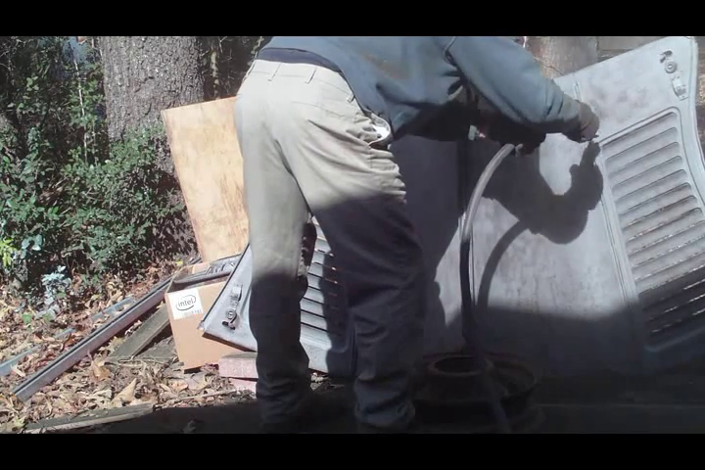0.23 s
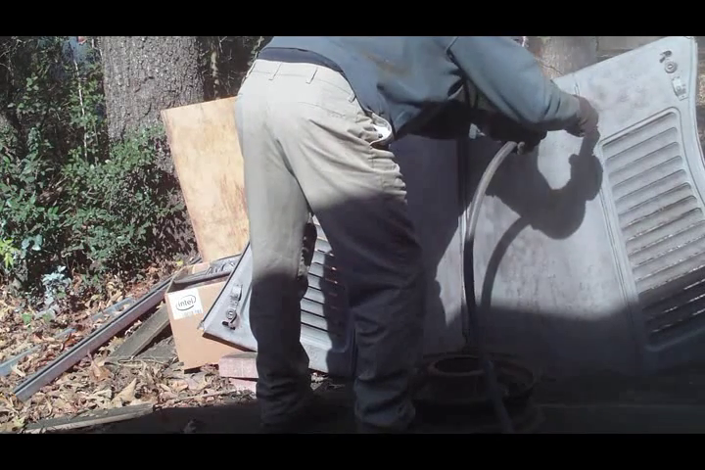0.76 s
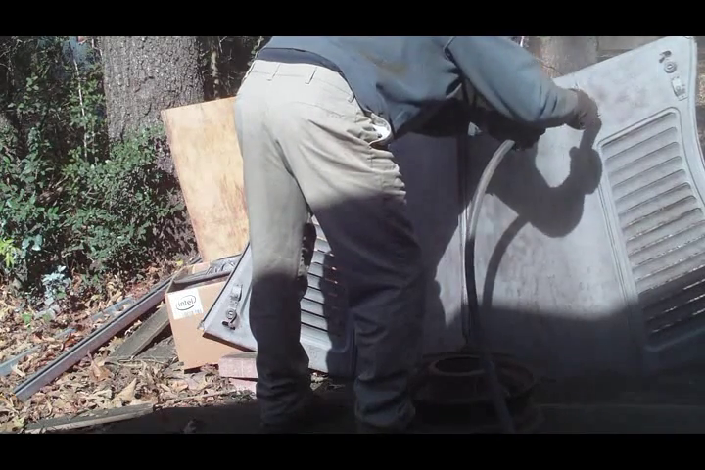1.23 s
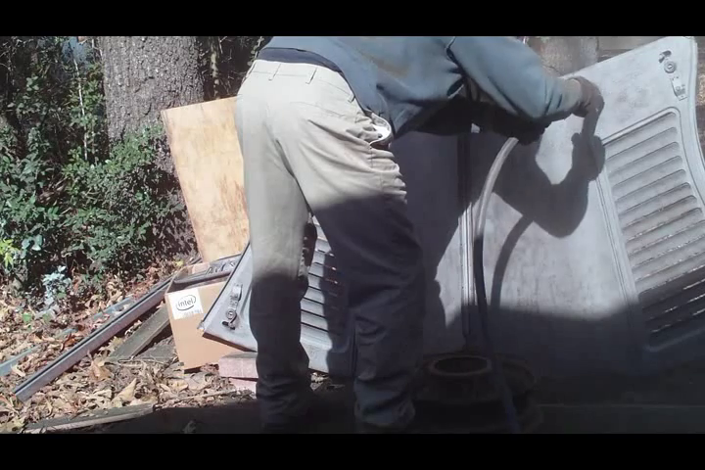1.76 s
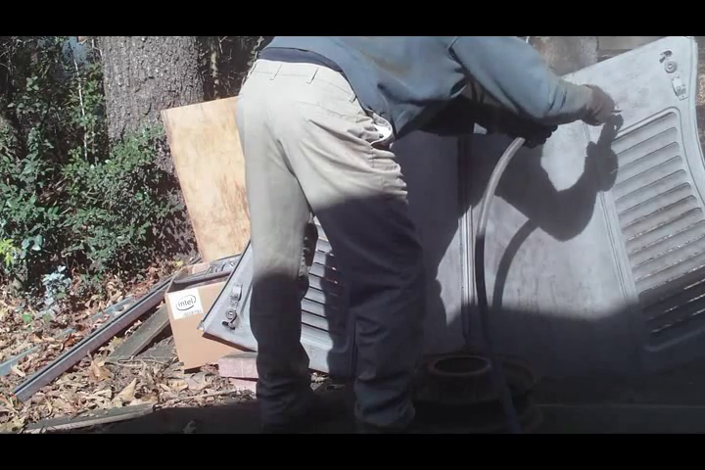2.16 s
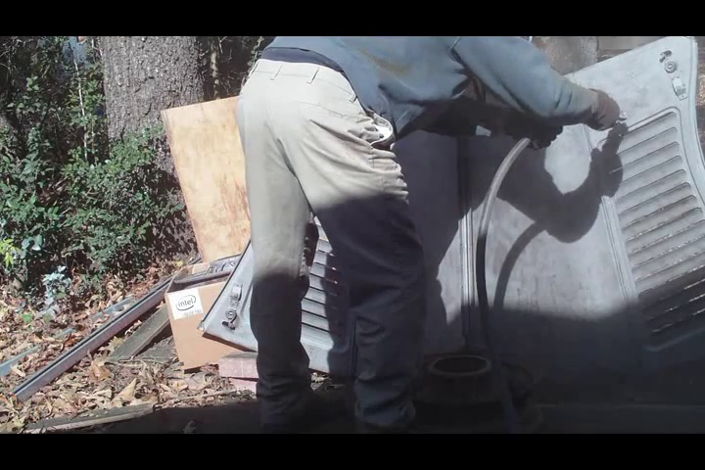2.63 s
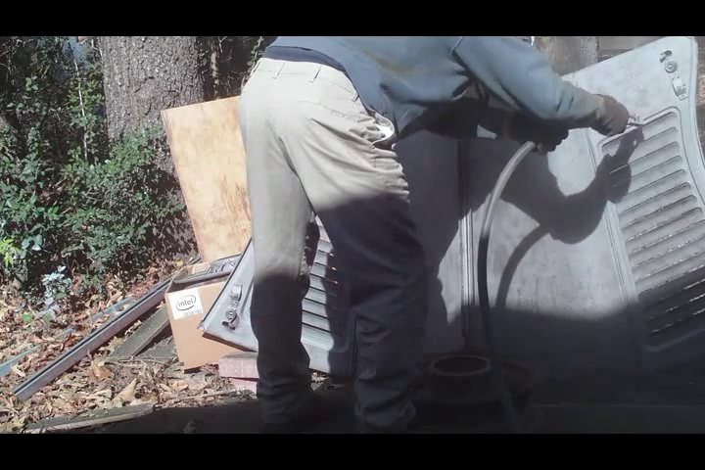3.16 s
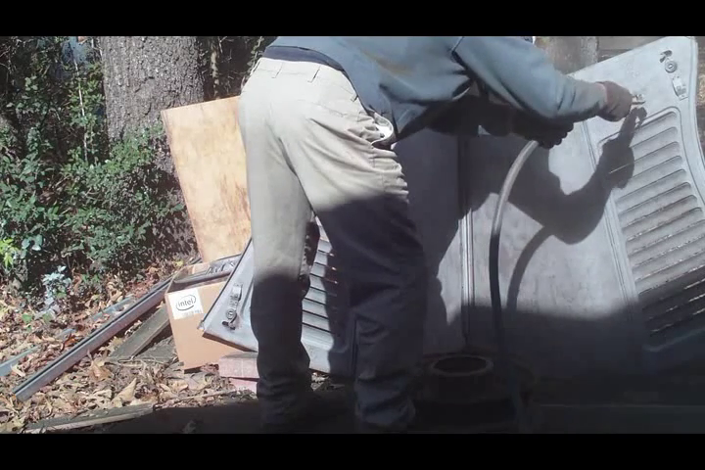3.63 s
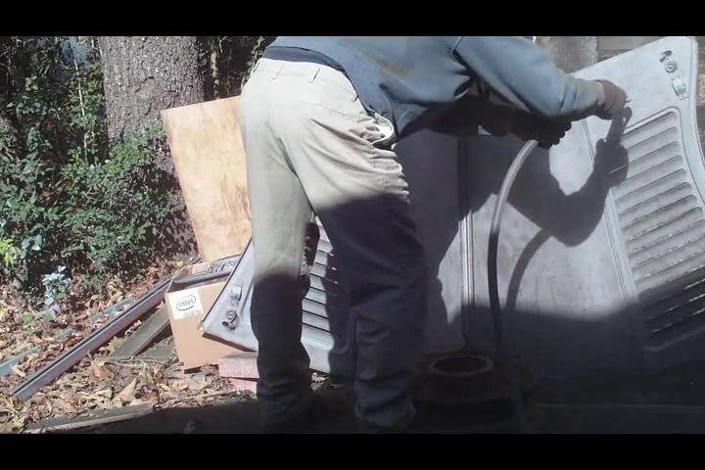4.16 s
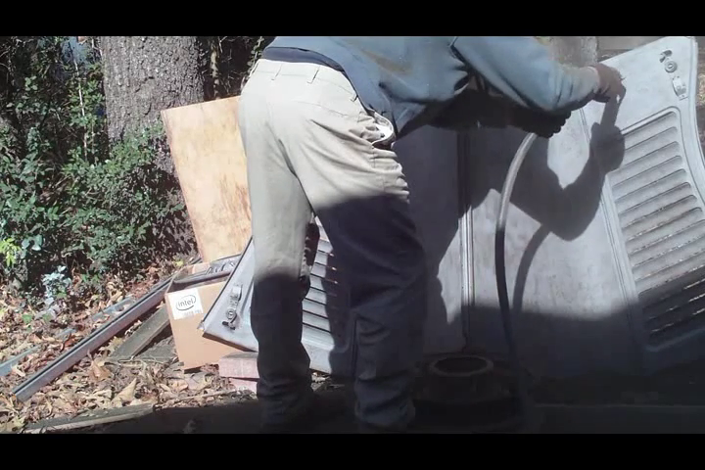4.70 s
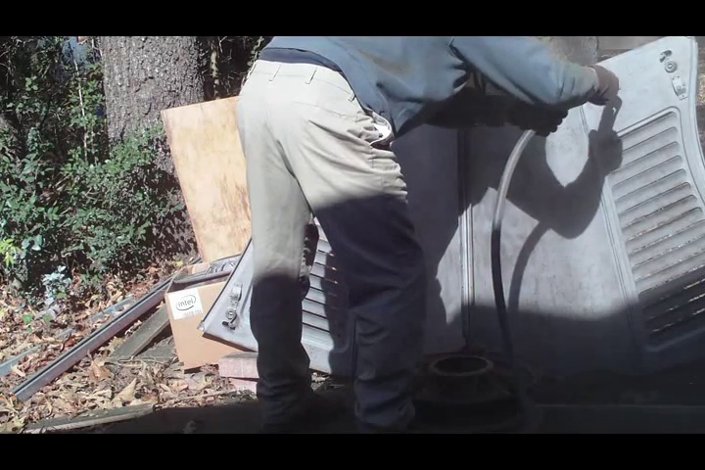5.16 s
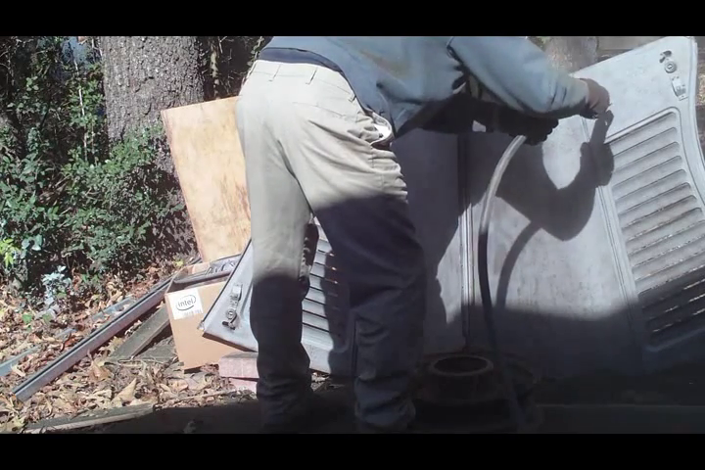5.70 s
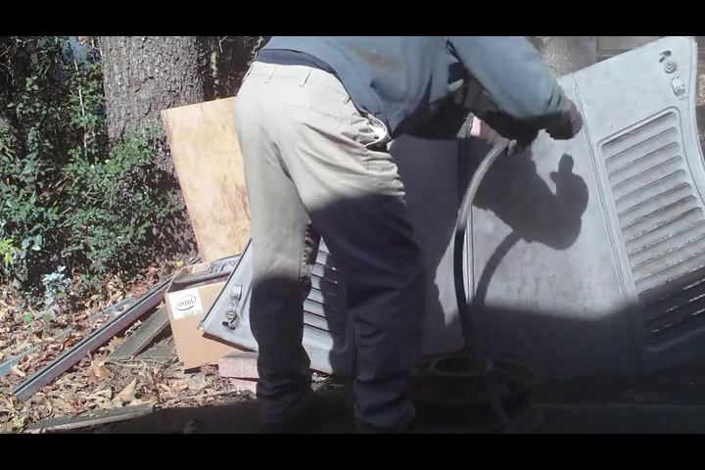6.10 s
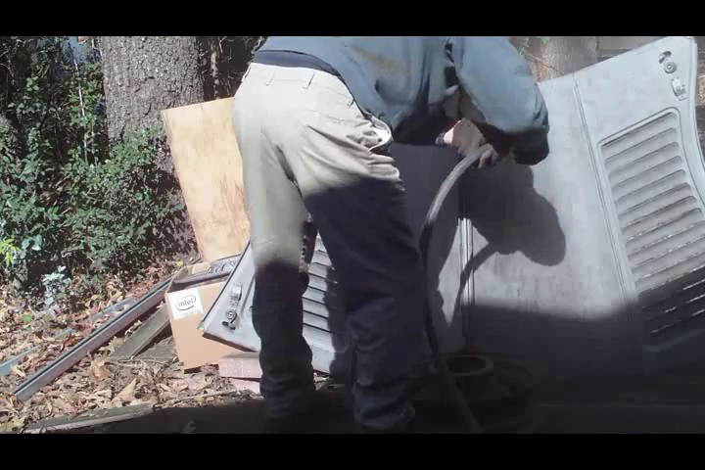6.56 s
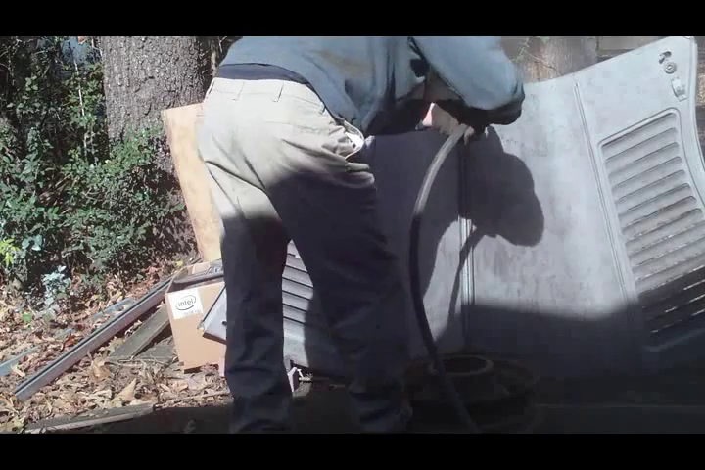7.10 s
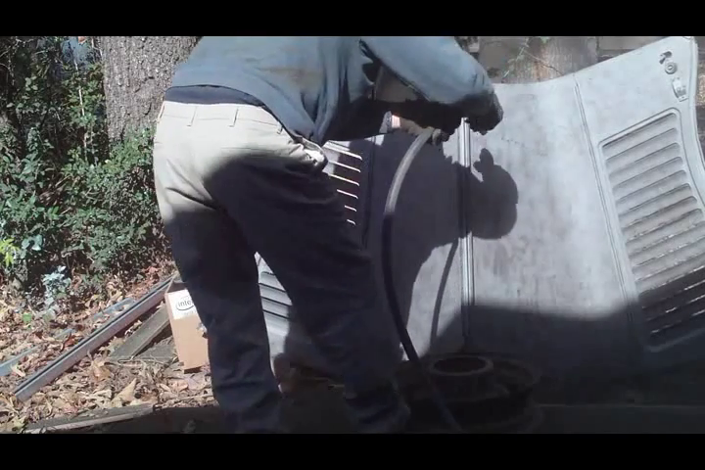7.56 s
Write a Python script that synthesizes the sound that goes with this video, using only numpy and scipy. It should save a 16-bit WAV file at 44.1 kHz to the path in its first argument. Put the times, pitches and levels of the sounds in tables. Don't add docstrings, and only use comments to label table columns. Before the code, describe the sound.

A loud, harsh sandblasting hiss with a faint high whistle roars across sheet steel over a low compressor hum, easing slightly near the end.

```python
import sys
import numpy as np
from scipy import signal
from scipy.fft import rfft, irfft
from scipy.io import wavfile
from scipy.ndimage import uniform_filter1d

SR = 44100
rng = np.random.default_rng(int(sys.argv[2]) if len(sys.argv) > 2 else 0)


def linear_from_db(decibels):
    return 10 ** (np.asarray(decibels, float) / 20)


def bounce(signal):
    frames = np.transpose(np.atleast_2d(signal))
    limited = np.clip(frames, -1, 1)
    pcm = np.round(limited * 32767).astype(np.int16)
    wavfile.write(sys.argv[1], SR, pcm)


N = 345303
WORKING_DB = -15.5

# shaft_multiple, level_db
PUMP_TONES = [(2, -8.3), (3, -26.0), (4, -8.9), (5, -31.0), (6, -13.9), (7, -28.8), (8, -20.9), (9, -28.6),
              (10, -16.3), (11, -35.5), (12, -18.8), (13, -26.3), (14, -16.2), (15, -25.8), (16, -22.4),
              (17, -18.4), (18, -3.5), (19, -13.8), (20, 0.0), (21, -17.8), (22, -24.1), (23, -18.5),
              (24, -21.9), (25, -21.3), (34, -19.1), (36, -15.8), (38, -18.1), (39, -18.5), (40, -13.4),
              (42, -18.1)]
# shaft_multiple, level_db
VALVE_TONES = [(46, -22.9), (50, -22.2), (54, -18.2), (55, -15.0), (58, -11.1), (60, -22.3), (62, -19.8),
               (63, -16.8), (64, -17.7), (65, -18.8), (66, -16.0), (67, -17.8), (70, -21.4), (72, -18.1),
               (73, -20.3), (74, -21.3), (75, -16.1), (76, -15.1), (78, -20.7), (84, -20.3), (116, -21.1)]
# belt_multiple, level_db
BELT_TONES = [(2, -34), (3, -27), (4, -16), (5, -22), (6, -32)]
# pitch_hz, level_db
MOTOR_TONES = [(46.25, -27), (58.5, -19.5), (72, -27), (120, -17), (312.75, -24), (326.5, -20)]
# pitch_hz, level_db
YARD_COLOUR = [(20, -7), (45, 11), (80, 9), (150, 0), (260, -6), (310, -25), (350, -39), (430, 10),
               (520, -14)]
# pitch_hz, side_level_db
SIDE_COLOUR = [(500, -38), (900, -35), (1900, -51), (2100, -10.5), (2700, -15.5), (3000, -34),
               (3600, -18.5), (4300, -28.5), (6500, -40), (6900, -10.5), (8250, -12.5), (8600, -42),
               (8950, -9.5), (11000, -28)]
# time_s, air_db, grit_db, swing (to the side, -1..1), tip (upward, -1..1)
HAND_PATH = [(0, -16, -22.5, -.1, 0.46), (.4, -15.5, -20.5, -0.38, 0.13), (.7, -15, -19.5, .4, -.6),
             (1.3, -16, -23, 0.98, 0), (1.8, -16, -22, 1, .6), (2.15, -16, -21.5, 0, -.2),
             (2.85, -14.5, -21.5, -0.6, -0.66), (3.15, -16.5, -22, -0.61, 0),
             (3.5, -15.5, -22, -0.23, -0.4), (4.15, -16, -21.5, -0.35, 0.38), (4.6, -15, -22.5, -0.76, -.2),
             (5.2, -15.5, -23, -.6, 0.18), (5.7, -16, -22.5, .1, 0.87), (6.22, -15.5, -24, 0.13, -0.022),
             (6.36, -17.5, -25.5, .1, -0.52), (7.0, -18.5, -25.5, -0.43, -0.2),
             (7.45, -18.5, -23, -.1, -0.35), (7.83, -18.5, -26, -.3, -.6)]
# start_s, level_db
LOUVRE_RAKES = [
    (7.33, -23),
    (7.425, -22.5),
]
# pitch_hz, width_hz, level_db
LOUVRE_MODES = [(2640, 200, 0), (3150, 160, -4)]
# pitch_hz, level_db
STEEL_COLOUR = [(220, -15.5), (380, -4), (509, -7.5), (597, -3), (661, -2.5), (784, -5), (949, -5.5),
                (1230, -2), (1510, -4.5), (2040, -8), (2640, -0.5), (3610, -3.5), (4200, -10), (5460, -26),
                (9240, -120)]
# time_s, level_db, length_s, centre_hz
PANEL_BOOMS = [(.14, 7, 0.42, 650), (.8, 2, 0.16, 700), (1.6, 3, 0.4, 1110), (1.82, 2.5, 0.09, 700),
               (2.39, -6, 0.07, 1200), (2.9, 4.5, .2, 700), (3.156, 8, .2, 655), (3.3, 6, 0.058, 800),
               (3.414, 6.5, 0.087, 900), (4.038, 7.5, 0.078, 650), (4.226, 10.5, 0.072, 850),
               (4.5, -2.5, 0.23, 900), (4.847, 5, .08, 700), (5.1, 5, .3, 900), (5.42, -7, 0.072, 900),
               (5.75, 1.5, 0.2, 1770), (.75, 1.5, 0.27, 2000), (6.27, 6, .06, 700), (6.7, -0.5, .6, 700),
               (7.45, 4, 0.18, 1300), (7.6, 1.5, .4, 700), (.7, -1.5, 0.22, 2800), (1.26, 3, .15, 2800),
               (1.98, -1, .06, 2800), (3.38, 3.5, 0.13, 2500), (4.653, -1, .15, 2600),
               (6.05, 2.5, 0.27, 2750)]
# pitch_hz, level_db
AIR_COLOUR = [(3300, -21.5), (3750, -5.5), (4000, -5), (5000, -4), (5900, -5.5), (6300, -1.5), (7300, -2),
              (8100, -2.5), (8500, 0), (9400, -2.5), (9900, -6.5), (10900, -5.5), (11300, -13)]
# pitch_hz, width_hz, level_db
LIP_RESONANCES = [(8900, 200, 2.0), (10400, 250, 2.0), (5200, 300, 1.5), (4700, 200, -1.5)]
# pitch_hz, width_hz, db_per_swing, db_per_tip
JET_LOBES = [(4480, 520, -2, 0.8), (5700, 950, 3.5, -3.5), (6270, 1500, 0, 3)]
# time_s, level_db, length_s, pitch_hz
WHISTLE_FLARES = [(.6, 3, .15, 7760), (1.38, 4, .06, 7720), (2.3, 3.5, 0.39, 7700), (2.85, 3, .3, 7740),
                  (3.58, 2.5, .2, 7650), (4.0, 5, .2, 7720), (4.45, 5, .08, 7720), (4.72, 7, .08, 7700),
                  (5.15, 6.5, 0.14, 7700), (5.38, 7, 0.1, 7700), (5.85, 4, 0.19, 7350),
                  (6.17, 2, .08, 6900), (6.87, 6, .12, 6850), (7.5, 2, .15, 6600)]
# time_s, level_db, length_s
GRIT_SLUGS = [(0.414, -1.0, 0.061), (1.233, 1.5, 0.049), (1.302, -1.7, 0.045), (1.365, 1.5, 0.038),
              (1.631, -1.0, 0.056), (1.704, 1.5, 0.046), (1.967, -2, 0.047), (2.087, 1, 0.055),
              (2.22, 1.5, 0.056), (2.283, -2.5, 0.027), (2.325, 2.5, 0.047), (2.405, -2, 0.064),
              (2.58, -1.5, 0.05), (3.013, -2, 0.038), (3.312, 0.5, 0.08), (3.364, -3.5, 0.03),
              (4.163, -1, 0.06), (4.465, -0.5, 0.08), (4.546, -2.5, 0.055), (4.665, -2.5, 0.035),
              (4.722, -0.7, 0.08), (4.839, -1, 0.044), (4.939, -1, 0.048), (5.2, 1.4, 0.047),
              (5.268, -0.5, 0.055), (5.632, 2.5, 0.032), (6.166, 1, 0.041), (6.859, 0, 0.061),
              (7.286, -0.8, 0.087), (7.453, 0.8, 0.055)]


def evened(x):
    return x / np.sqrt(np.mean(abs(x) ** 2) + 1e-20)


def read(points, hz):
    f, value = np.transpose(points)
    return np.interp(np.log(hz + 1), np.log(f + 1), value)


def play(rows, t):
    s, *columns = np.transpose(rows)
    return [np.interp(t, s, c) for c in columns]


def bump(x, centre, width):
    return np.exp(-.5 * ((x - centre) / (.5 * width)) ** 2)


def drift(t, low_hz, high_hz):
    total = 0
    for f in np.geomspace(low_hz, high_hz, num=24):
        total = total + np.sin(2 * np.pi * (f * t + rng.random())) / np.sqrt(f)
    return evened(total)


def grid():
    t = np.arange(N // 128 + 8) * 128 / SR
    return t, np.fft.rfftfreq(512, 1 / SR)[:, None]


def patches(shape, bins, frames):
    z = rng.standard_normal(shape[::-1]).T
    for _ in range(2):
        z = uniform_filter1d(z, bins, 0)
        z = uniform_filter1d(z, frames, 1)
    return evened(z)


def hiss(field_db):
    hz = grid()[1]
    a, b, c, d = rng.standard_normal(field_db.shape[::-1] + (4,)).T
    side_noise = (c + 1j * d) * linear_from_db(read(SIDE_COLOUR, hz))
    z = np.array([a + 1j * b, side_noise]) * linear_from_db(field_db)
    mid, side = signal.istft(z, nperseg=512, noverlap=384)[1][:, :N]
    return np.array([mid + side, mid - side])


def level_to_one(field_db, hz, low_hz, high_hz):
    band = (hz[:, 0] > low_hz) & (hz[:, 0] < high_hz)
    power = (linear_from_db(field_db[band]) ** 2).sum(0)
    return -10 * np.log10(power) - 4.3


def yard_wash():
    white = rfft(rng.standard_normal((2, N)))
    mid, side = irfft(white * linear_from_db(read(YARD_COLOUR, np.fft.rfftfreq(N, 1 / SR))), N)
    return linear_from_db(-38) * evened(mid + linear_from_db(-13.0) * np.array([side, -side]))


def compressor_tone():
    shaft_hz, belt_hz, knock_db = 16.642, 12.92, -26
    stroke_rad = .55
    uneven_rad, spread_rad = 3.05, .4
    t = np.arange(0, N, 8) / SR
    coarse = t[::55]
    turns = shaft_hz * t + .002 * np.interp(t, coarse, drift(coarse, .2, 3))
    knocks = {k: knock_db for k in range(PUMP_TONES[-1][0] // 2, 88)}
    multiples = knocks | dict(PUMP_TONES) | dict(VALVE_TONES)
    tone = np.zeros(len(t))
    for k, db in multiples.items():
        breath_db = np.interp(t, coarse, 0.98 * drift(coarse, 0.292, 5))
        phase = 2 * np.pi * rng.random()
        if k < 16:
            phase = stroke_rad * k ** 2
        elif k <= 23:
            phase = uneven_rad * (k % 2) + spread_rad * (k - 19) ** 2
        tone += linear_from_db(db + breath_db) * np.cos(2 * np.pi * k * turns + phase)
    belt = [(k * belt_hz, db) for k, db in BELT_TONES]
    for f, db in belt + MOTOR_TONES:
        tone += linear_from_db(db) * np.cos(2 * np.pi * (f * t + rng.random()))
    return signal.resample_poly(tone, up=8, down=1)[:N]


def compressor():
    pump_db, gain_ride = -23.5, 0.78
    air_db = uniform_filter1d(play(HAND_PATH, np.arange(N) / SR)[0], size=30000)
    level_db = pump_db + gain_ride * np.maximum(WORKING_DB - air_db, 0)
    return linear_from_db(level_db + 2.0) * compressor_tone() + linear_from_db(level_db + 25) * yard_wash()


def rake():
    attack_s, hold_s, fall_db_per_s = .012, .035, 110
    t, hz = grid()
    modes = sum(linear_from_db(db) * bump(hz, f, w) for f, w, db in LOUVRE_MODES)
    colour = 20 * np.log10(modes + 1e-5) + 0 * t
    gain = np.zeros(len(t))
    for s, db in LOUVRE_RAKES:
        fall_db = fall_db_per_s * np.maximum(t - s - hold_s, 0)
        gain += np.clip((t - s) / attack_s, 0, 1) * linear_from_db(db - fall_db)
    level_db = level_to_one(colour, hz, low_hz=2000, high_hz=4000) + 6.0
    return hiss(colour + 20 * np.log10(gain + 1e-6) + level_db)


def sheet():
    roar_follows = 0.58
    rattle_db, fizz_db, boom_width_octaves = 1.4, -0.03, 1.07
    t, hz = grid()
    grit_db = play(HAND_PATH, t)[1]
    colour = read(STEEL_COLOUR, hz) + 0 * t
    field = colour + grit_db + level_to_one(colour, hz, low_hz=450, high_hz=1600) + 2.5
    field = field + (roar_follows - 1) * (grit_db + 24.5) * bump(hz, 750, 1500)
    field = field + rattle_db * bump(hz, 1760, 720)
    field = field + (fizz_db + 0.58 * drift(t, 3, 12)) * bump(hz, 2680, 840)
    for s, db, length, centre_hz in PANEL_BOOMS:
        band = bump(np.log2(hz + 1), np.log2(centre_hz), boom_width_octaves)
        field = field + db * bump(t, s, length) * band
    spots = 0.53 * patches(field.shape, bins=2, frames=14)
    return hiss(field + spots)


def jet():
    t, hz = grid()
    level_db, _, swing, tip = play(HAND_PATH, t)
    whistle_hz = 7600 + 60 * drift(t, 0.315, 1.7)
    whistle_db = 2 + 0.7 * swing - 3 * tip
    field = read(AIR_COLOUR, hz) + sum(db * bump(hz, f, w) for f, w, db in LIP_RESONANCES)
    field = field + whistle_db * bump(hz, whistle_hz, 240)
    field = field + level_db + level_to_one(field, hz, low_hz=7530, high_hz=10430) + 6.0
    for f, w, swing_db, tip_db in JET_LOBES:
        lobe_db = swing_db * swing + tip_db * tip + 0.32 * drift(t, 4, 8.9)
        field = field + lobe_db * bump(hz, f, w)
    for s, db, length, f in WHISTLE_FLARES:
        field = field + db * bump(t, s, length) * bump(hz, f, 380)
    shadow_db = 0.46 * np.minimum(level_db - WORKING_DB - 0.5, 0)
    field = field + shadow_db * bump(hz, 4800, 3600)
    eddies = 0.77 * patches(field.shape, bins=4, frames=8)
    return hiss(field + eddies)


def echoes(x):
    hz, t, z = signal.stft(x, SR, nperseg=2048, noverlap=1536)
    notch_db = -4 * bump(hz[:, None], 3660, 290)
    ripple_db = 2.3 * patches(z.shape[1:], bins=2, frames=8) + notch_db
    return signal.istft(z * linear_from_db(ripple_db - 0.77), SR, nperseg=2048, noverlap=1536)[1][:, :N]


def flow():
    t = np.arange(N // 64 + 2) * 64 / SR
    surge_db = 0.54 * drift(t, 6.7, 40)
    for s, db, length in GRIT_SLUGS:
        surge_db = surge_db + db * bump(t, s, length)
    return linear_from_db(np.interp(np.arange(N) / SR, t, surge_db))


def scene():
    blast = flow() * echoes(jet() + sheet())
    return compressor() + rake() + blast


def band_limit(x):
    return signal.sosfilt(signal.butter(12, 12260, fs=SR, output="sos"), x)


def record(dry):
    soft = dry / (1 + abs(dry / .86) ** 6) ** (1 / 6)
    low_pass = signal.firwin(601, 11100, window=("kaiser", 9), fs=SR)
    limited = signal.oaconvolve(soft, low_pass[None], "same")
    return band_limit(limited)


dry = scene()
out = record(dry)
bounce(out)
```